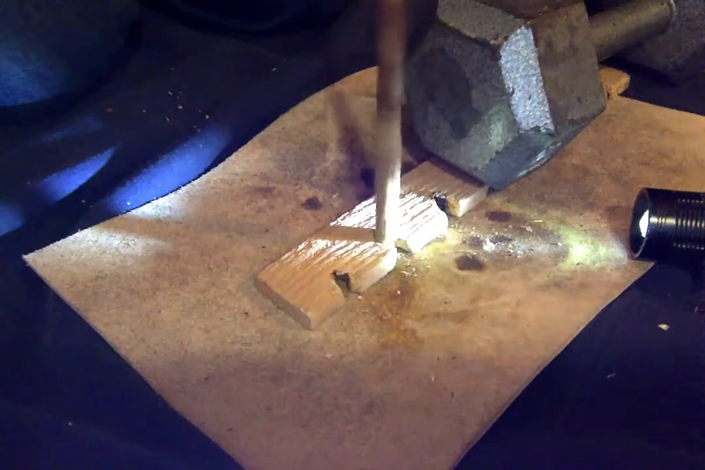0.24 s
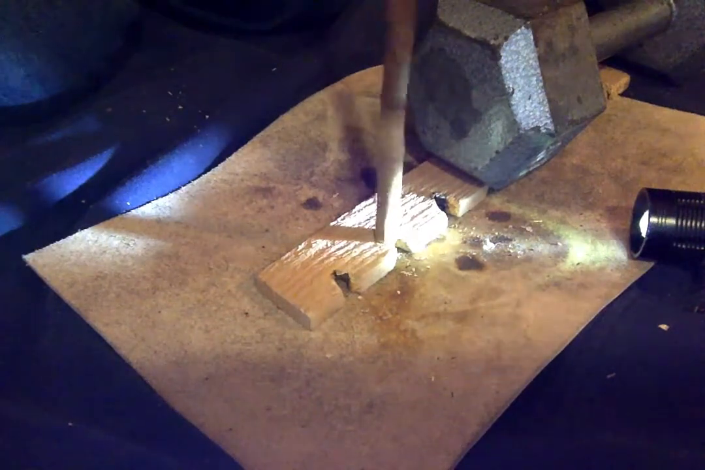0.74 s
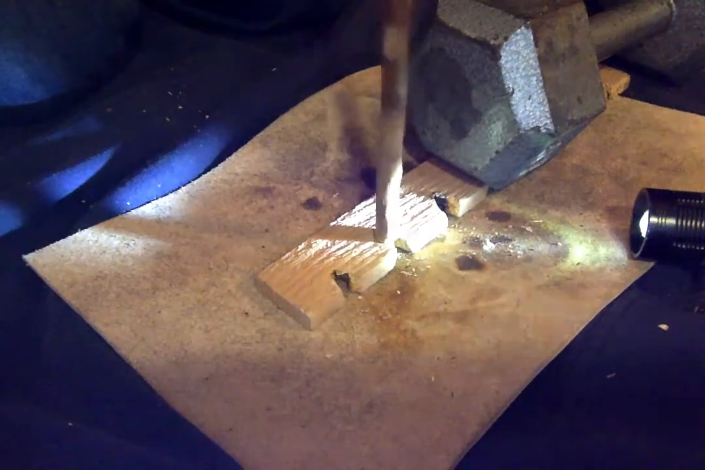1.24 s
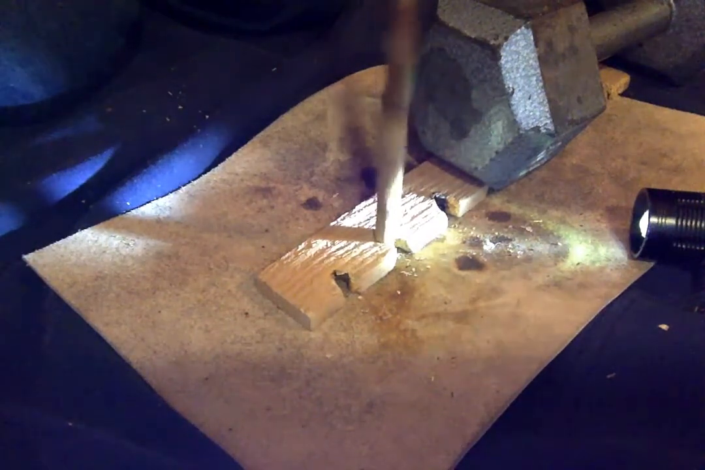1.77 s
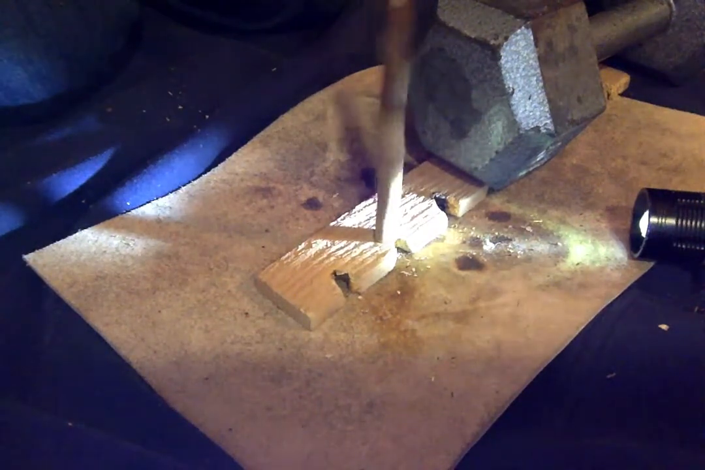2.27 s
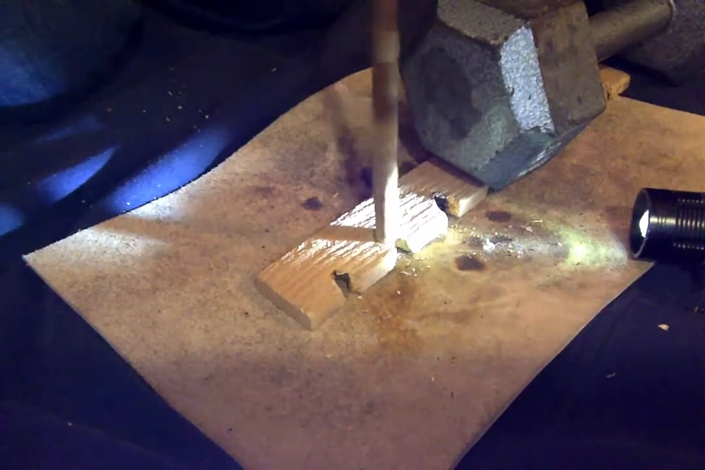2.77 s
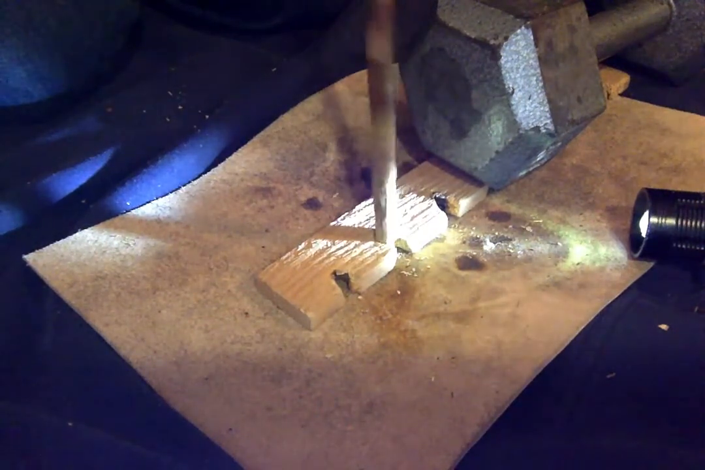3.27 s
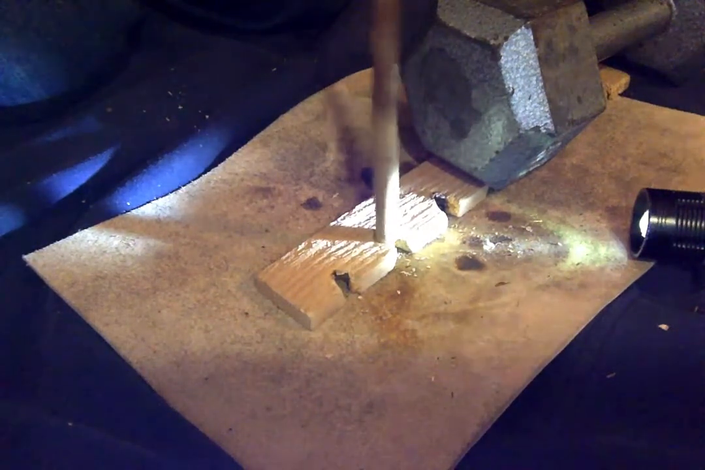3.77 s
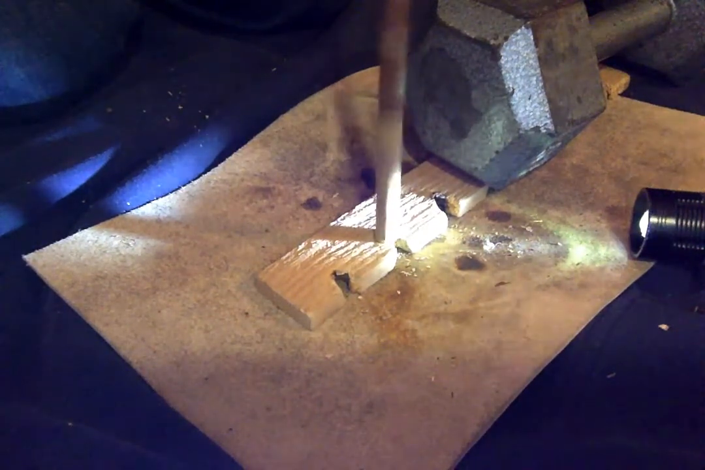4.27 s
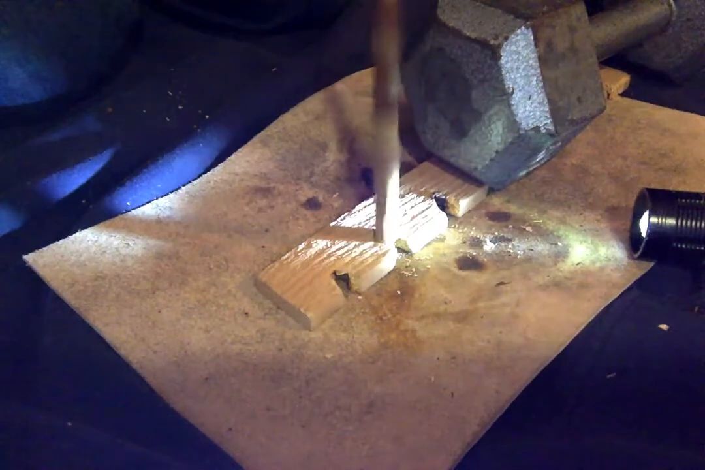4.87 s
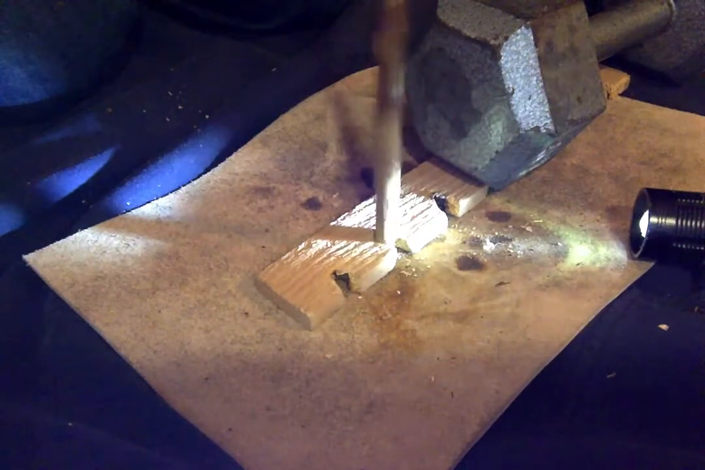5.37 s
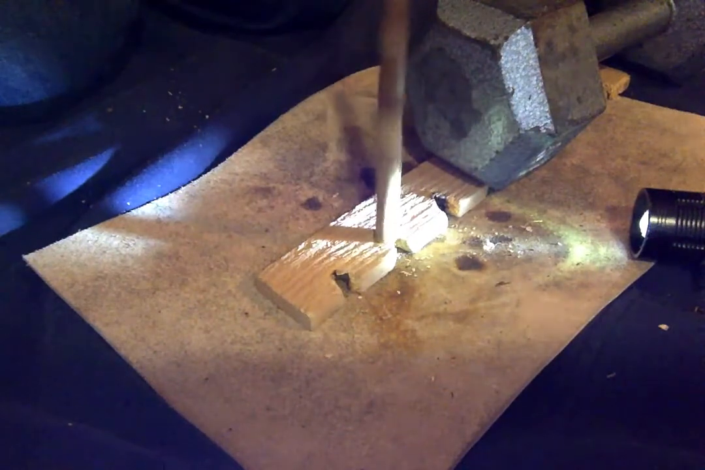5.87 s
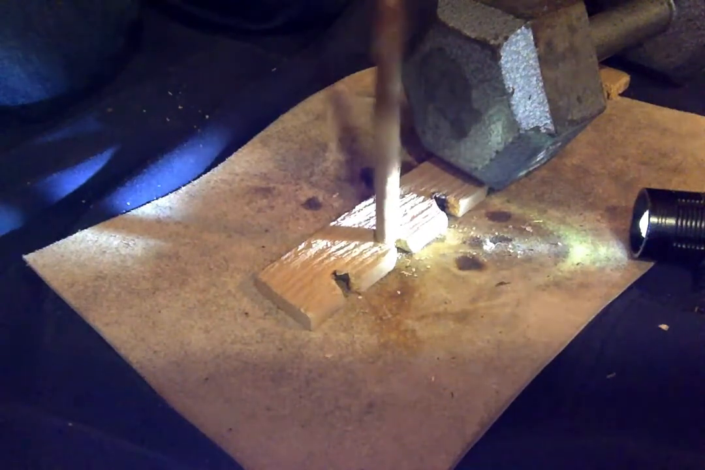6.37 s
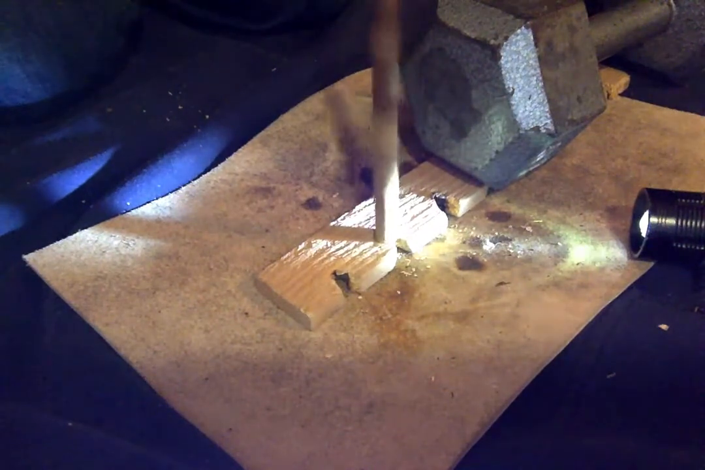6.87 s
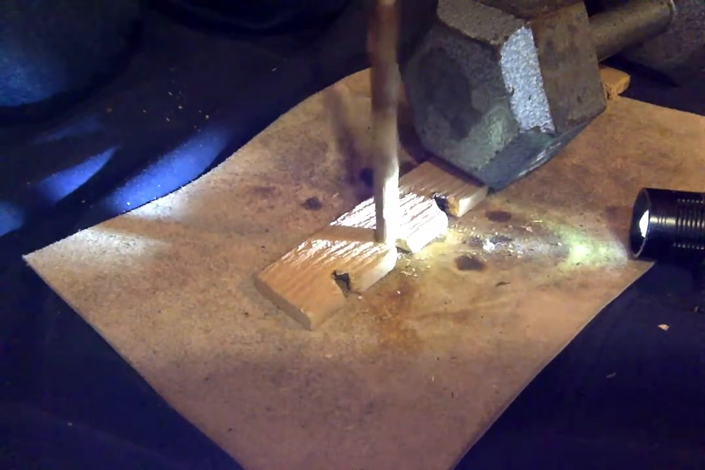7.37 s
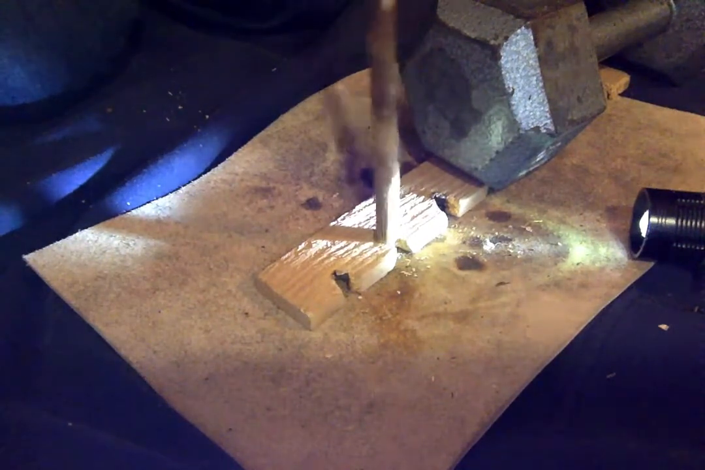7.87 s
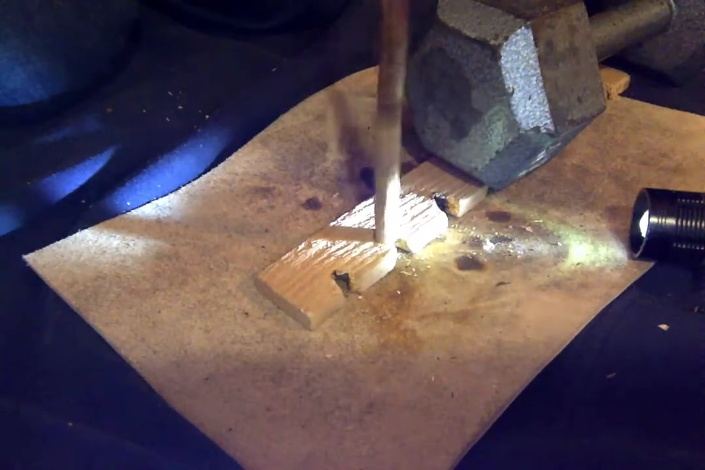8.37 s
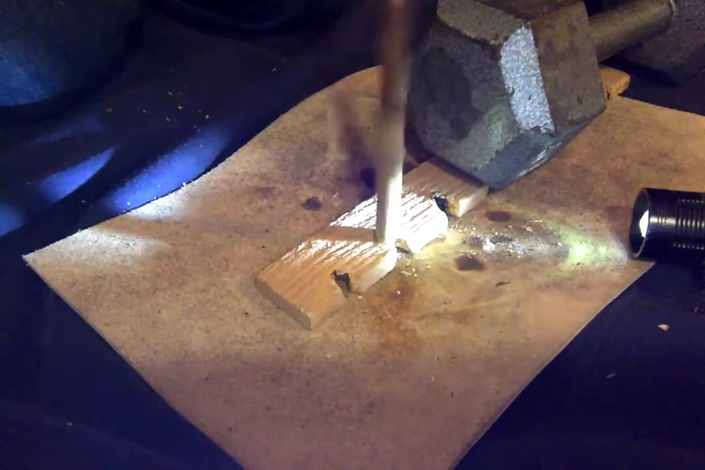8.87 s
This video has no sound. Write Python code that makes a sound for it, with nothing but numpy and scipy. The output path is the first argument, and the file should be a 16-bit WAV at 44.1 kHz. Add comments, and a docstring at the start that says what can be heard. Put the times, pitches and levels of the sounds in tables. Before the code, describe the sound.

Close up, wood grinds on wood in a fast, unbroken back-and-forth rhythm as a fire-making stick twirls in its socket. The raspy strokes alternate slightly stronger and weaker, with a faint hollow creak underneath, very brief high squeaks and soft ticks as the stick turns round. The pace picks up in the second half. The surroundings are quiet and still, with only a slight scatter of echo.

```python
"""At a small hearth board on a mat, in still air: a wooden spindle is spun back and forth between palms.
Each stroke grinds wood on wood: it gathers speed, is pressed hardest near its middle, and stalls at
the reversal. Stick-slip makes the spindle chirp, the tip squeak and the board grunt.
The spindle knocks lightly in its socket as it turns round; nearby things return short echoes."""
import sys
import numpy as np
from scipy import signal
from scipy.fft import rfft, irfft, next_fast_len
from scipy.io import wavfile
from scipy.ndimage import uniform_filter1d

SR = 44100
rng = np.random.default_rng(int(sys.argv[2]) if len(sys.argv) > 2 else 0)


def store_pcm(level_fs):
    """Save levels as 16-bit WAV."""
    pcm = np.round(np.clip(level_fs, -1, 1) * 32767).astype(np.int16)
    wavfile.write(sys.argv[1], SR, np.atleast_2d(pcm).T)


N = 402633
TIME_S, HZ = np.arange(N) / SR, np.fft.rfftfreq(N, 1 / SR)

# Palm strokes, back and forth in turn.
# Each row: start in seconds, length in seconds, grinding level in dB, share spent speeding up.
STROKES = [(-0.198, 0.29, -26.5, 0.3), (0.137, 0.28, -31, 0.18), (0.452, 0.27, -29.0, 0.14),
           (0.747, 0.29, -32.5, 0.22), (1.035, 0.29, -28, 0.23), (1.348, 0.29, -32.0, 0.22),
           (1.654, 0.26, -28.5, 0.26), (1.961, 0.26, -31.5, 0.19), (2.225, 0.27, -28.5, 0.25),
           (2.517, 0.28, -31, 0.22), (2.752, 0.31, -29.5, 0.3), (3.052, 0.32, -34, 0.29),
           (3.349, 0.26, -30.5, 0.26), (3.631, 0.272, -32.5, 0.28), (3.879, 0.29, -29.5, 0.35),
           (4.205, 0.26, -32.5, 0.17), (4.447, 0.27, -30, 0.28), (4.74, 0.28, -33.5, 0.25),
           (4.989, 0.27, -31, 0.27), (5.275, 0.25, -32.5, 0.25), (5.517, 0.26, -29.0, 0.25),
           (5.802, 0.22, -31.5, 0.19), (6.044, 0.21, -29, 0.3), (6.28, 0.229, -32, 0.21),
           (6.51, 0.232, -29.5, 0.298), (6.769, 0.22, -31.5, 0.2), (6.975, 0.24, -29, 0.34),
           (7.227, 0.22, -32, 0.26), (7.424, 0.26, -30.5, 0.34), (7.7, 0.2, -31.5, 0.25),
           (7.896, 0.24, -29.5, 0.31), (8.141, 0.2, -31, 0.33), (8.377, 0.23, -29.5, 0.31),
           (8.626, 0.21, -31, 0.35), (8.838, 0.19, -27.5, 0.35), (9.057, 0.2, -31.5, 0.36)]
# Scrape spectrum going forth. Each row: frequency in Hz, level in dB.
FORTH_SPECTRUM = [(1400, -56), (2000, -7), (3200, -3.5), (4200, -2), (5100, -3.5), (5650, 2), (6500, 3.5),
                  (7050, -3.5), (8200, 2), (10100, -0.5), (10900, -7), (12200, -5), (14000, -6),
                  (15800, -8.5)]
# Modes of spindle and board. Each row: frequency in Hz, width in Hz, level in dB.
SPINDLE_MODES = [(1550, 60, 6), (1672, 280, 5)]
BOARD_MODES = [(673, 173, 3), (858, 160, -1.5), (1006, 75, 2.5), (1129, 43, 0.5), (1272, 360, -5.5),
               (2170, 260, -2.5)]


def grinding(turn_hz=36, wobble_db=0.85):
    """The tip scrapes its socket and shakes spindle and board; the contact tightens once a turn."""
    forth, travel, speed_db, grind_db, push_db = palms()
    turns = np.cumsum(turn_hz * amp(.3 * speed_db + 1.524 * wander(5.39))) / SR
    wobble = np.sin(2 * np.pi * turns) + 0.78 * wander(43)
    force = amp(grind_db + wobble_db * wobble + catches(86, 0.022) + 0.66 * wander(450))
    hiss = moving_contact(scrape(forth, speed_db), travel, speed_db)
    ring = spindle_ring(forth, speed_db)
    board_drive = amp(-22.5 - 0.017 * speed_db) * force + amp(push_db + 2 + 1.3 * wobble)
    board = board_drive * grit(humps(BOARD_MODES), 4.36, 170)
    return force * (hiss + ring) + board + creak(speed_db) + rumble(push_db, wobble)


def palms(fall_share=(.33, .48), swell_db=(2, -6), push_at=(.56, .52), firm_db=(-45, -42.5)):
    """Hand motion: direction, travel, speed re full, grinding level, push. Pairs are (back, forth)."""
    t = TIME_S[::40]
    start_s, length_s, level_db, rise_share = np.transpose(STROKES)
    way = np.arange(len(start_s)) % 2
    shares = (t[:, None] - start_s) / length_s
    starting = np.maximum(1 - shares / rise_share, 0) ** 2.13
    slowing = np.maximum(1 - (1 - shares) / np.take(fall_share, way), 0) ** 2.02
    lag = starting + slowing
    stroke = lag.argmin(axis=1)  # each stroke takes over as the last dies
    speed_db = np.maximum(-30 * lag.min(axis=1), -28.5)  # floor: the stall
    forth = way[stroke]
    share = np.clip((t - start_s[stroke]) / length_s[stroke], 0, 1)
    travel = np.where(forth, share, 1 - share)
    grind_db = level_db[stroke] + speed_db + np.take(swell_db, forth) * (share - .5)
    bearing_down = np.exp(-((share - np.take(push_at, forth)) / 0.14) ** 2)
    push_db = np.take(firm_db, forth) + wear(t)[1] + .5 * speed_db + 11 * (bearing_down - 1)
    curves = np.array([forth, travel, speed_db, grind_db, push_db])
    return [np.interp(TIME_S, t, uniform_filter1d(curve, size=5)) for curve in curves]


def wear(at_s):
    """(Shrillness, push) in dB: as the socket wears in, the tip squeals less and the palms press more."""
    # Course of the wear. Each row: time in seconds, shrillness in dB, push in dB.
    course = [(0, 1.5, -0.5), (2.6, 1, -1), (5.1, 3.5, -1.5), (5.6, -0.5, 0), (9.1, -2, 1.5)]
    times_s, shrill_db, push_db = np.transpose(course)
    return np.interp(at_s, times_s, shrill_db), np.interp(at_s, times_s, push_db)


def scrape(forth, speed_db):
    """Broad friction noise, coloured by direction; the tip's resonances take over around 8-10 kHz."""
    # Scrape spectrum going back. Each row: frequency in Hz, level in dB.
    back_spectrum = [(1180, -52), (2000, -8), (3000, -4.5), (3220, -7), (3480, -1), (4170, -2),
                     (5270, -5.5), (5600, -2.5), (6430, 1.5), (7130, -5), (8700, -5.5), (9990, -9),
                     (11000, -10), (12500, -7.5), (15800, -13)]
    # Tip modes. Each row: frequency in Hz, width in Hz, level in dB.
    tip_modes = [(7830, 1800, -3), (8680, 670, 0), (9740, 1300, -0.7)]
    notch = 1 - 0.64 * np.exp(-np.abs((HZ - 8700) / 1400) ** 3)
    broad = forth * grit(outline(FORTH_SPECTRUM) * notch, 0.2, 3200)
    broad += (1 - forth) * grit(outline(back_spectrum) * notch, 1.7, 3200)
    broad_db = np.interp(forth, [0, 1], [-1.37, -0.38])
    tip_db = np.interp(forth, [0, 1], [-6, -12]) + wear(TIME_S)[0] + 0.033 * speed_db
    return amp(broad_db) * broad + amp(tip_db) * grit(humps(tip_modes), 1.35, 200)


def moving_contact(x, travel, speed_db, hump_db=5.0, width_oct=0.21, shadow_db=3.5, patchy_db=3.5):
    """The contact circles the socket: one resonance sweeps, small ones flicker, slow rubbing is dull."""
    # Path of the resonance. Each row: share of the way forth, frequency in Hz.
    path = [(0, 2880), (.15, 4500), (.28, 4750), (.42, 4800), (.6, 6400), (1, 6715)]
    hz, t, spectra = signal.stft(x, SR, nperseg=512, noverlap=384)
    position, slow_db = np.interp(t, TIME_S, travel), np.interp(t, TIME_S, speed_db)
    above = np.log2((hz[:, None] + 1) / np.interp(position, *np.transpose(path))) / width_oct
    hollow = np.exp(-((position - 0.22) / 0.17) ** 2)  # early going forth, late coming back
    sweep_db = hollow * (hump_db * np.exp(-above ** 2) - shadow_db * np.exp(-(above - 2.4) ** 2))
    patches = uniform_filter1d(rng.standard_normal(spectra.shape), size=3, axis=0)
    patches = unit(uniform_filter1d(patches, size=9, axis=1))
    treble_db = np.clip((hz[:, None] - 4500) / 7500, 0, 1) * 0.37 * np.minimum(slow_db, 0)
    spectra *= amp(sweep_db + patchy_db * patches + treble_db)
    return signal.istft(spectra, SR, nperseg=512, noverlap=384)[1][:N]


def spindle_ring(forth, speed_db):
    """Slips ring the spindle; a firm, fast grip stiffens it and raises the pitch."""
    ring = grit(humps(SPINDLE_MODES), 3.6, 104)
    ring = bent(ring, amp(-0.1449 + .035 * speed_db + .22 * wander(24.42)))
    ring_db = np.interp(forth, [0, 1], [-8, -4.5]) - 0.018 * speed_db
    return amp(ring_db + 1.63 * catches(86, 0.0037)) * ring


def creak(speed_db, level_db=-51):
    """Below full speed the tip judders with a hollow, wandering creak, louder as the palms bear down."""
    judder = np.exp(-((speed_db + 6) / 11) ** 2)
    gain = amp(level_db + 1.34 * wear(TIME_S)[1] + 1.2 * catches(36, 0.012))
    hollow = grit(humps([(734, 83, -0.4), (999, 120, -0.1), (1517, 98, -3.3)]), 2.8, 180)
    return judder * gain * bent(hollow, amp(.7 * wander(25.1)))


def rumble(push_db, wobble):
    """The push rocks the board on its mat."""
    # Rocking spectrum. Each row: frequency in Hz, level in dB.
    spectrum = [(30, -38), (70, -40), (120, -8.5), (200, -17.5), (290, -0.5), (390, 3.5), (520, 4.5),
                (700, -5), (1100, 5.5), (2000, -39.5)]
    thrust = amp(push_db - 4.5 + 2.9 * wobble + 4.3 * wander(86)) * rng.standard_normal(N)
    return colour(thrust, unit(outline(spectrum)))


def chirps(waver=0.018, glide=.02, overtone_db=-32, rasp=0.053, crunch_db=-9):
    """For a few milliseconds stick-slip locks to one mode: a tone swells and breaks off."""
    # Loudest board grunts, spindle chirps and tip squeaks.
    # Each row: centre in seconds, level in dB, pitch in Hz, length in seconds.
    bursts = [(0.199, -16, 1575, 0.0072), (0.245, -7, 1572, 0.0077), (0.856, -15.5, 1610, 0.0063),
              (1.102, -32, 308, 0.0075), (1.214, -6, 8870, 0.002), (1.418, -18.5, 1594, 0.0064),
              (1.8, -10.5, 8360, 0.0047), (2.134, -21, 1530, 0.0059), (2.319, -14, 7900, 0.0044),
              (2.376, -11.5, 8740, 0.0036), (2.631, -25, 386, 0.0046), (2.91, -12, 8670, 0.0031),
              (2.94, -11, 8790, 0.004), (3.1, -21.5, 1600, 0.0074), (3.431, -12, 8190, 0.0046),
              (3.695, -7.5, 1636, 0.0093), (3.821, -18.5, 1517, 0.0069), (3.978, -8, 8470, 0.0027),
              (4.032, -14.5, 7840, 0.012), (4.072, -27.5, 449, 0.0041), (4.539, -9.5, 6520, 0.0032),
              (4.603, -12.5, 8060, 0.0076), (5.361, -14.5, 1566, 0.0071), (6.196, -16.5, 1631, 0.0043),
              (7.104, -28, 561.4, 0.0049), (8.025, -31, 413, 0.0056), (8.408, -28.5, 450, 0.008)]
    out, t = np.zeros(N), np.arange(-.025, .025, 1 / SR)
    unsteady, jitter = wander(560), wander(1570)
    crunch = amp(crunch_db) * grit(humps(BOARD_MODES), 2.2, 300)
    for at_s, db, hz, length_s in bursts + stray_chirps():
        here = slice(round(at_s * SR), round(at_s * SR) + len(t))
        is_squeak, is_grunt = hz > 5000, hz < 1000
        drift = waver * unsteady[here] + rasp * is_squeak * jitter[here]
        phase = 2 * np.pi * (np.cumsum(hz * (1 + drift + glide * t / length_s)) / SR + rng.random())
        tone = np.sin(phase) + amp(overtone_db) * np.sin(2 * phase)
        swell = amp(db - 2.0) * 2 ** -(2 * t / length_s) ** 2
        add(out, at_s + t[0], swell * (tone + is_grunt * crunch[here]))
    return out


def stray_chirps(spread_db=3, detune=.055, scatter=.16, per_stroke=2):
    """Rows of faint chance bursts near mid-stroke."""
    rows = []
    for k, (start_s, length_s, level_db, _) in enumerate(STROKES):
        if k % 2:  # forth: the spindle chirps
            over_db, hz, burst_s = 4.2, 1580, .0061
        else:  # back: the tip squeaks
            over_db, hz, burst_s = 6.7 + 2.5 * wear(start_s)[0], 8700, .0045
        for when, strength, pitch in np.clip(rng.standard_normal((per_stroke, 3)), -1.5, 1.5):
            at_s = start_s + length_s * (.5 + scatter * when)
            rows.append((at_s, level_db + over_db + spread_db * strength, hz * (1 + detune * pitch), burst_s))
    return [row for row in rows if .03 < row[0] < N / SR - .06]


def knocks(ring_t60_s=0.041, tick_t60_s=0.026, attack_s=0.0034, scuff_db=-13, scuff_t60_s=0.062):
    """The spindle shifts against the rim: a soft tick, a short wooden ring, a scuff as it settles."""
    # Clearest knocks. Each row: start in seconds, level in dB, sharpness in dB.
    blows = [(0.472, -16, -30), (0.763, -28.5, -17), (1.033, -30, -4), (1.655, -19.5, -16),
             (2.216, -21, -14), (2.692, -14.5, -10), (3.087, -16.5, -13), (3.374, -14.5, 4),
             (3.902, -25, 0), (4.462, -22.5, -8), (4.607, -13, -4), (5.008, -18.5, 1), (6.629, -16, -10),
             (6.788, -27, -13), (6.979, -17.5, -22), (7.434, -25.5, 3), (7.604, -21, -1),
             (7.91, -20.5, -15), (8.062, -32, -10), (8.149, -21.5, -18)]
    out, t = np.zeros(N), np.arange(4000) / SR
    modes = BOARD_MODES + SPINDLE_MODES
    rubbing, dust = grit(humps(modes), 2.05, 180), grit(outline(FORTH_SPECTRUM), 3.3, 1000)
    for at_s, db, sharp_db in blows + take_up_knocks():
        # each blow lands elsewhere and favours other modes
        wood = sum(amp(mode_db + 7.5 * rng.standard_normal()) * np.sin(2 * np.pi * (hz * t + rng.random()))
                   for hz, _, mode_db in modes if hz < 2000)
        ring = wood / abs(wood).max() * amp(-60 * t / ring_t60_s)
        tick = amp(sharp_db - 9.0 - 60 * t / tick_t60_s) * dust[round(at_s * SR):][:len(t)]
        scuff = amp(scuff_db - 60 * t / scuff_t60_s) * rubbing[round(at_s * SR):][:len(t)]
        attack = np.minimum(t / (attack_s * rng.uniform(0.6, 1.4)), 1)
        add(out, at_s, amp(db - 3) * attack * (ring + tick + scuff))
    return out


def take_up_knocks(delay_s=0.01, scatter_s=0.00697, level_db=-30, sharp_db=-19, spread_db=9.0):
    """Rows of soft knocks, one early in each stroke, firmer as the palms bear down."""
    rows = []
    for start_s, *_ in STROKES:
        when, strength, edge = rng.uniform(-1, 1, 3)
        db = level_db + wear(start_s)[1] + spread_db * strength
        rows.append((start_s + delay_s + scatter_s * when, db, sharp_db + 2 * spread_db * edge))
    return [row for row in rows if 0 < row[0] < N / SR - .1]


def surroundings(x, wet_db=-16, t60_s=0.54, echoes_per_s=2000):
    """The mat and things nearby throw back a short scatter of echoes."""
    t = np.arange(1500) / SR
    taps = rng.standard_normal(len(t)) * (rng.random(len(t)) < echoes_per_s / SR)
    taps *= (t > .001) * amp(-60 * t / t60_s)
    return x + amp(wet_db) * signal.oaconvolve(x, taps / np.linalg.norm(taps))[:N]


def still_air(level_db=-72):
    """Faint, steady low noise."""
    # Air spectrum. Each row: frequency in Hz, level in dB.
    spectrum = [(20, -38), (45, -30), (60, -12), (115, 7.5), (200, -7), (400, -11), (1500, -20),
                (8000, -30), (16000, -40)]
    return amp(level_db) * unit(colour(rng.standard_normal(N), outline(spectrum)))


def grit(gain, clump_db, clump_hz):
    """Countless tiny slips, arriving in clumps, heard through a gain curve."""
    slips = rng.standard_normal(N) * amp(clump_db * np.clip(wander(clump_hz), -2, 2))
    return unit(colour(slips, gain))


def catches(per_s, fade_s):
    """Random grabs of the tip that come at once and ease off; rms about 1."""
    grabs = (rng.random(N) < per_s / SR) * rng.uniform(0.96, 1, N)
    grip = signal.lfilter([1], [1, -np.exp(-1 / (fade_s * SR))], grabs)
    return np.minimum(unit(uniform_filter1d(grip - grip.mean(), 60)), 2)


def wander(rate_hz):
    """Smooth noise up to about rate_hz, rms 1."""
    return unit(colour(rng.standard_normal(N), np.exp(-(HZ / rate_hz) ** 2)))


def outline(points):
    """Gain curve through (Hz, dB) points."""
    hz, db = np.transpose(points)
    return amp(np.interp(np.log(HZ + 1), np.log(hz), db))


def humps(modes):
    """Gain curve of damped modes with steep skirts."""
    return np.sqrt(sum((amp(db) / (1 + (2 * (HZ - hz) / width_hz) ** 2)) ** 2
                       for hz, width_hz, db in modes))


def colour(x, gain):
    """Filters by a gain curve."""
    size = next_fast_len(N + 4096)
    return irfft(rfft(x, size) * np.interp(np.fft.rfftfreq(size, 1 / SR), HZ, gain), size)[:N]


def bent(x, ratio):
    """Bends pitch by a changing ratio."""
    return np.interp(np.cumsum(ratio) % N, np.arange(N), x)


def add(mix, at_s, sound):
    """Mixes a sound in."""
    part = mix[max(round(at_s * SR), 0):][:len(sound)]
    part += sound[:len(part)]


def amp(db):
    """Decibels to gain."""
    return 10 ** (np.asarray(db) / 20)


def unit(x):
    """Scales to rms 1."""
    return x / np.sqrt(np.mean(x ** 2) + 1e-20)


def scene():
    """The hand drill, close by, over still air; mono."""
    air = still_air()
    return (surroundings(grinding() + chirps() + knocks()) + air)[None]


def record(dry):
    """Low-pass at 15.9 kHz."""
    return signal.oaconvolve(dry, signal.firwin(511, 15900, window=("kaiser", 9), fs=SR)[None], "same")


dry = scene()
out = record(dry)
store_pcm(out)
```